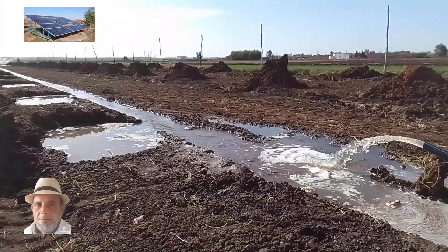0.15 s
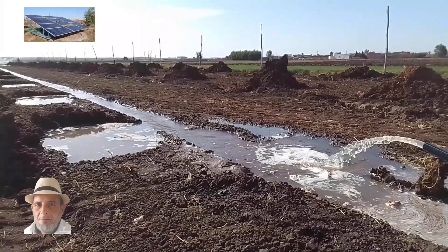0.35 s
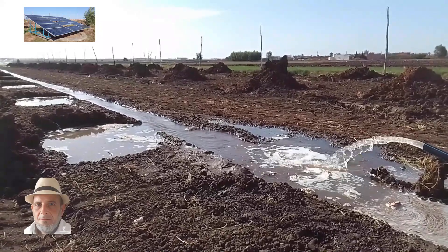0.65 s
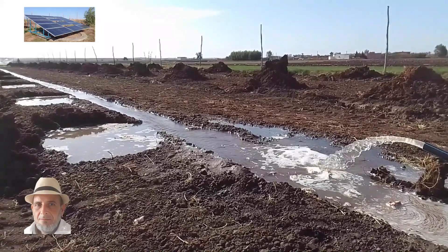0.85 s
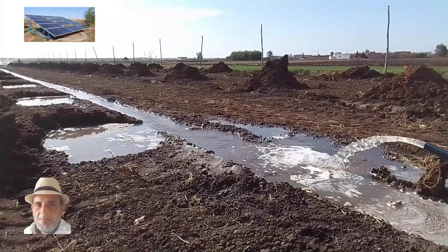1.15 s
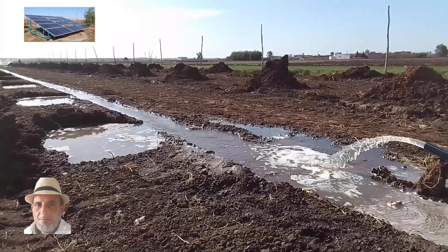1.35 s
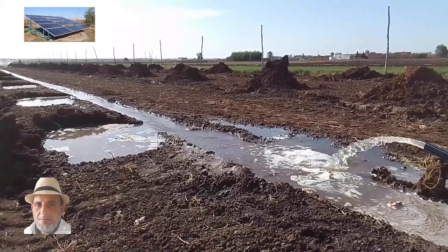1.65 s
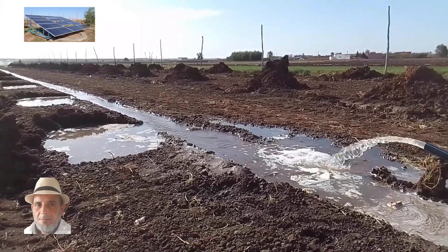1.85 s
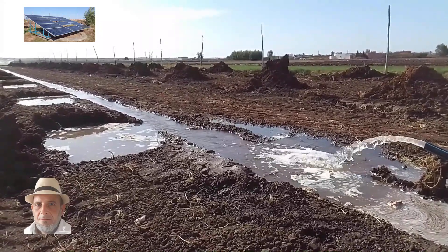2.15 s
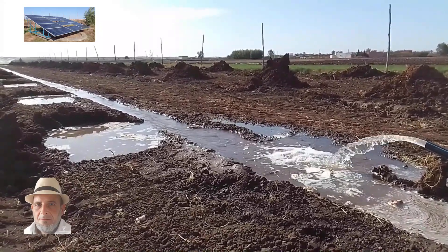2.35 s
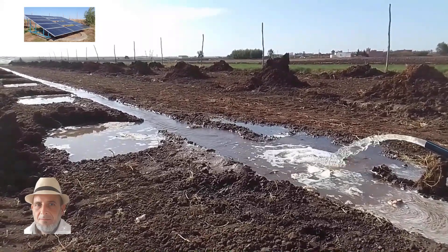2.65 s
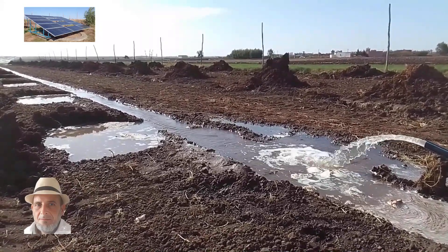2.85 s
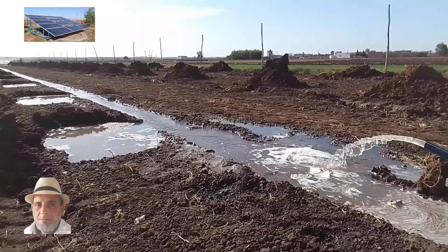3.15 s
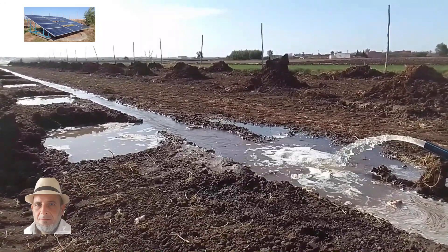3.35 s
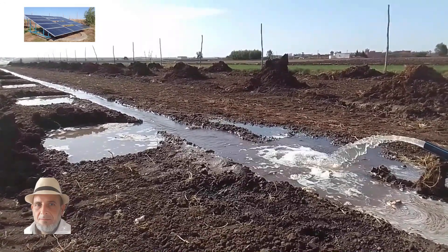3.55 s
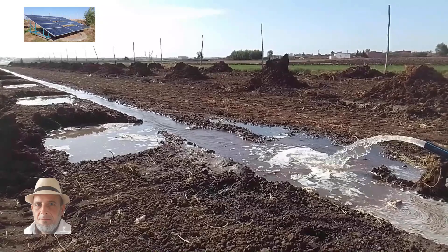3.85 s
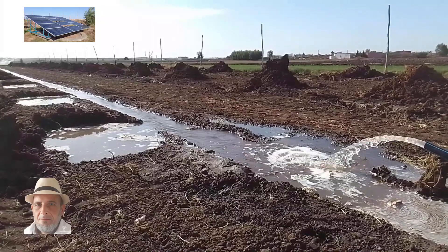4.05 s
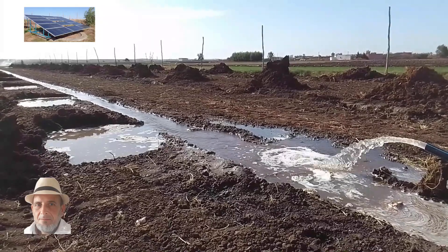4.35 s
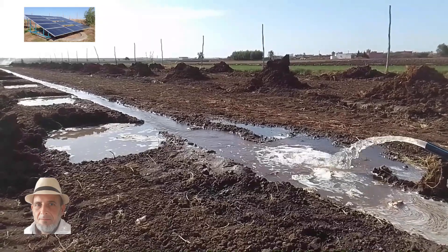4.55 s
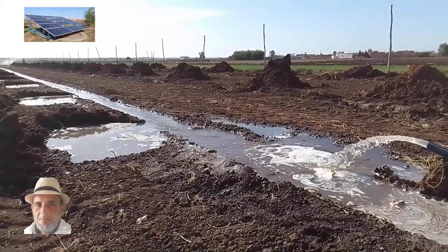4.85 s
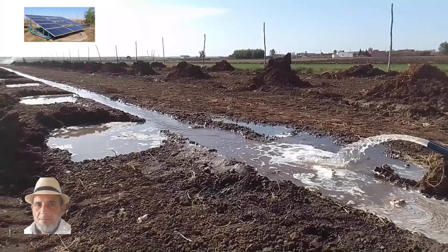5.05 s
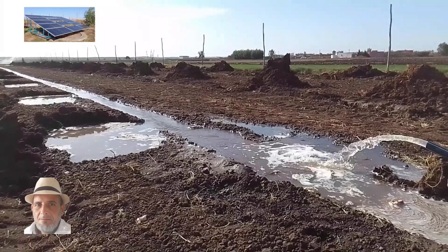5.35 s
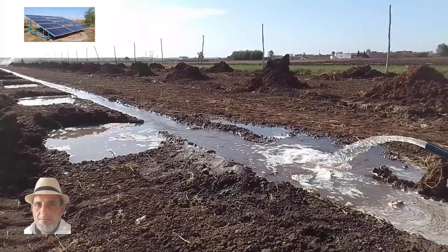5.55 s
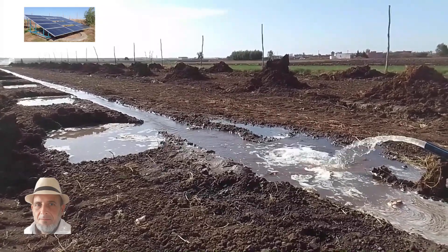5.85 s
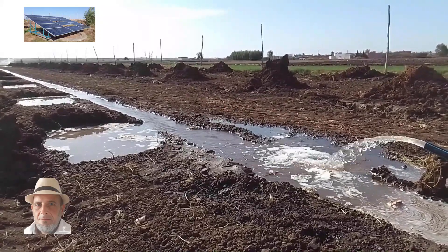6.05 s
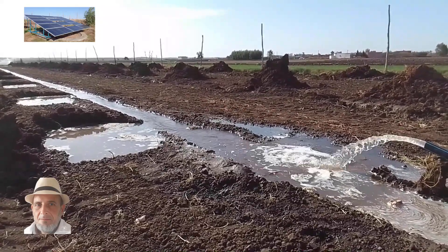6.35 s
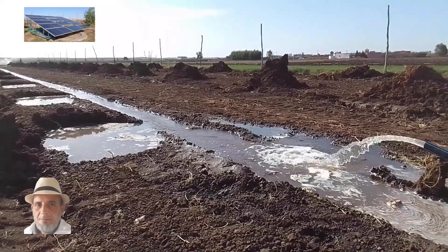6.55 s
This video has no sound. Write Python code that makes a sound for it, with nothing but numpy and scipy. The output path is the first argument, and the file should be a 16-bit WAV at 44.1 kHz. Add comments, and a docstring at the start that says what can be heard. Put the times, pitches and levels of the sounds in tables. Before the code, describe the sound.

A thick jet of water from an irrigation hose plunges into a flooded furrow in an open field. It splashes continuously in small uneven surges, churning the pool with gurgling bubbles while fine spray patters and fizzes on the surface. Brief plops, sharp drop ticks and faint smacks poke through at random. The sound is bright, with no echo, as from one small microphone.

```python
"""Hose jet in a flooded furrow

A thick irrigation jet plunges into standing water in an open field. It lands in lumps: each churns
the pool, traps air bubbles that ring, and throws spray that patters back. Large air pockets plop,
near drops tick, flat blobs smack. No echo; one small microphone with a bright port."""
import sys
import numpy as np
from scipy import signal
from scipy.fft import rfft, irfft
from scipy.io import wavfile

SR = 44100
rng = np.random.default_rng(int(sys.argv[2]) if len(sys.argv) > 2 else 0)


def waveform_to_disk(signal):
    """Save audio, clipped to [-1, 1], as 16-bit WAV at the path in sys.argv[1]."""
    frames = np.transpose(np.atleast_2d(signal))
    scaled = np.clip(frames, -1, 1) * 32767
    samples = np.round(scaled).astype(np.int16)
    wavfile.write(sys.argv[1], SR, samples)


N = 295029

# droplets falling on water: (frequency [Hz], gain [dB])
SPRAY_SPECTRUM = [(30, -40.5), (400, -8), (1800, -6), (2800, -13.5), (4200, -16.5), (5600, -11),
                  (6300, -11.5), (7900, -6.5), (8800, -2), (10300, 2), (11500, -9), (12700, -17.5),
                  (14300, -20), (16000, -32)]
# snap of an impact over a faint push of air: (frequency [Hz], gain [dB])
SNAP_SPECTRUM = [(30, -12), (150, -10), (1500, -25), (3800, -2), (5300, 7.5), (7200, 10), (11000, 2.5),
                 (16000, -25)]


def gain_of(db):
    """dB to amplitude."""
    return 10 ** (np.asarray(db) / 20)


def unit_rms(x):
    """Scale to rms 1."""
    return x / np.sqrt(np.mean(x ** 2) + 1e-20)


def curve(points):
    """Spectrum table as a function Hz -> dB, linear over log frequency."""
    knots_hz, db = np.transpose(points)
    return lambda hz: np.interp(np.log(hz + 1), np.log(knots_hz + 1), db)


def add(mix, start_s, sound):
    """Mix a sound in at start_s."""
    part = mix[max(round(start_s * SR), 0):][:len(sound)]
    part += sound[:len(part)]


def coloured(x, db_at, size=4096):
    """Minimum-phase filter of gain db_at(Hz): clicks ring only after they strike."""
    log_gain = np.log(gain_of(db_at(abs(np.fft.fftfreq(size, 1 / SR)))))
    taps = np.fft.ifft(np.exp(signal.hilbert(log_gain).conj())).real
    return signal.oaconvolve(x, taps[:size // 2])[:N]


def wander(slow_hz, fast_hz):
    """Random drift, rms 1, equal power per octave between two rates."""
    hz = np.fft.rfftfreq(N, 1 / SR) + 1e-6
    shape = 1 / np.sqrt(hz * (1 + (slow_hz / hz) ** 4) * (1 + (hz / fast_hz) ** 4))
    return unit_rms(irfft(rfft(rng.standard_normal(N)) * shape, N))


def impacts(per_s, spread_db, cap):
    """Random clicks of either sign: most near size 1, a few up to cap * spread_db away."""
    size = gain_of(spread_db * np.minimum(rng.exponential(1, N), cap))
    return size * rng.choice([-1, 1], N) * (rng.random(N) < per_s / SR)


def arch(start_s, length_s, rise_share=0.4):
    """Quick swell from 0 to 1, slower ebb."""
    knots_s = [start_s, start_s + rise_share * length_s, start_s + length_s]
    return np.sin(np.pi * np.interp(np.arange(N) / SR, knots_s, [0, 0.5, 1]))


def jet_surges(lull_db=-3.5):
    """Lift of pool and spray in dB: thick slugs of the jet mostly raise both, each by its own amount (a few
    lower the pool); thin stretches lower both."""
    # slugs, one splash each: (start [s], length [s], pool lift [dB], spray lift [dB])
    slugs = [(0.11, 0.23, 0.5, 1.5), (0.248, 0.29, 2, 1), (0.523, 0.089, 1, 5), (.92, 0.037, 0, 2.5),
             (0.99, 0.1, 3, 0.5), (1.202, 0.19, 2.5, 0), (1.513, 0.038, 2, 5.5), (1.696, 0.14, 0, 3.5),
             (2.032, 0.085, 0, 1), (2.482, 0.15, -2.5, 3.5), (2.643, 0.1, 5, 1.5), (2.896, 0.16, -0.5, 3.5),
             (3.104, 0.058, 3.5, 5.5), (3.244, 0.04, 4, 2.5), (3.363, 0.31, 1.5, 2.5),
             (3.648, 0.039, 4.5, 2), (3.795, 0.17, 3, 0.5), (4.02, 0.18, 0, 3), (4.343, .06, 2, 2.5),
             (4.44, 0.28, 2, 1.5), (4.75, 0.11, 2.5, 1), (4.917, 0.36, 0, 2.5), (5.277, 0.18, 2.5, 2.5),
             (5.541, 0.036, 3, 5), (5.937, 0.036, 4, 1), (6.064, 0.047, 3.5, 3.5), (6.142, 0.034, 3.5, 4),
             (6.298, 0.06, 3.5, 2.5), (6.507, 0.07, 4, 1)]
    # thin stretches: (start [s], length [s])
    lulls = [(0.635, 0.045), (1.14, 0.054), (1.384, 0.044), (1.975, 0.054), (2.6, 0.049), (3.013, 0.065),
             (3.309, 0.058), (3.573, 0.099), (3.72, 0.13), (5.69, 0.051), (5.852, 0.035), (6.196, 0.093)]
    thick_db = sum(np.outer(lifts_db, arch(start_s, length_s)) for start_s, length_s, *lifts_db in slugs)
    thin = sum(arch(start_s, length_s) for start_s, length_s in lulls)
    return thick_db + lull_db * thin


def churn(lumps, lump_db=1.38, flicker_db=1.75, wash_db=-5, level_db=-1.5):
    """The jet slaps the pool over a wash of foam."""
    # churning pool: (frequency [Hz], gain [dB])
    pool_spectrum = [(20, -34), (80, -38), (130, -21.5), (220, -11), (400, -17.5), (600, -6.5), (1000, -2),
                     (1250, -2), (1450, 2.5), (1780, -1.5), (2080, 2.5), (2500, -13), (3200, -19.5),
                     (6000, -49)]
    slaps = unit_rms(impacts(per_s=1500, spread_db=3.5, cap=4.9))
    wash = gain_of(wash_db) * rng.standard_normal(N)
    envelope = gain_of(lump_db * lumps + flicker_db * wander(8.2, 105))
    return gain_of(level_db) * unit_rms(coloured((slaps + wash) * envelope, curve(pool_spectrum)))


def bubble_ring(hz, swell_cycles, glide, samples=3000):
    """One air pocket swells and dies away; its pitch rises as it nears the surface."""
    cycles = hz * np.arange(samples) / SR
    age = cycles / swell_cycles
    pitch_hz = hz * (1 + glide * np.tanh(age / 4))
    return age * np.exp(1 - age) * np.sin(2 * np.pi * np.cumsum(pitch_hz) / SR)


def bubbles(band_hz, per_s, swell_cycles, glide, spread_db, tilt_db, level_db, sizes=40):
    """Trapped bubbles ring at random, the smaller the higher; tilt_db is the gain change up the band."""
    low_hz, high_hz = band_hz
    births = impacts(per_s, spread_db, cap=3)
    size_index = rng.integers(0, sizes, N)
    out = np.zeros(N)
    for k, (offset, sustain) in enumerate(rng.random((sizes, 2))):
        smallness = (k + offset) / sizes
        hz = low_hz + (high_hz - low_hz) * smallness
        ring = gain_of(tilt_db * smallness) * bubble_ring(hz, swell_cycles * (0.5 + sustain), glide)
        out += signal.oaconvolve(births * (size_index == k), ring)[:N]
    return gain_of(level_db) * unit_rms(out)


def spray(lumps, lump_db=1.63, flicker_db=2.15, mist_db=-7, level_db=-2):
    """Clumps of droplets patter on the water over a fine mist."""
    drops = unit_rms(impacts(per_s=4000, spread_db=3.5, cap=3.9))
    mist = gain_of(mist_db) * rng.standard_normal(N)
    envelope = gain_of(lump_db * lumps + flicker_db * wander(36, 170))
    return gain_of(level_db) * unit_rms(coloured((drops + mist) * envelope, curve(SPRAY_SPECTRUM)))


def plops(swell_cycles=1.35, glide=0.073, trim_db=-0.4):
    """The largest air pockets close and ring for a few strong cycles."""
    # air pockets: (time [s], level [dB], starting pitch [Hz])
    pockets = [(0.1317, -18.5, 1710), (0.303, -21.5, 2400), (0.3478, -22, 950), (0.5374, -18.5, 1520),
               (0.562, -43, 252), (0.566, -17.5, 1430), (0.939, -11, 1520), (1.0321, -17, 1760),
               (1.138, -43, 220), (1.3034, -22, 1730), (1.3354, -21, 1450), (1.4234, -21.5, 1510),
               (1.7086, -19.5, 1880), (1.8494, -25, 890), (2.167, -43, 242), (2.4209, -18.5, 1920),
               (2.4653, -25.5, 850), (2.506, -16.5, 2030), (2.5437, -19.5, 1800), (2.6882, -18, 1500),
               (2.7761, -14, 1790), (2.843, -26, 570), (2.853, -29, 1480), (2.904, -16, 1940),
               (2.947, -19, 1610), (3.1415, -18, 1690), (3.26, -39, 253), (3.298, -35, 425),
               (3.769, -21, 1430), (4.0431, -14.5, 1890), (4.3657, -19, 1760), (4.379, -20, 1970),
               (4.5927, -17.5, 1540), (4.6636, -17.5, 1480), (4.67, -15.5, 1920), (4.73, -25.5, 1020),
               (4.824, -33.5, 310), (4.9657, -24, 990), (5.2844, -29, 980), (5.3124, -20, 1340),
               (5.447, -13, 1890), (5.5415, -27, 790), (5.5508, -22, 1850), (5.612, -24, 630),
               (5.9212, -17, 2010), (6.0174, -17, 1700), (6.147, -17.5, 1900)]
    out = np.zeros(N)
    for start_s, db, hz in pockets:
        add(out, start_s, gain_of(db + trim_db) * bubble_ring(hz, swell_cycles, glide))
    return out


def ticks(ping_hz=9700, ping_db=-0.5, crack_db=-4, scatter_db=-11, scatter_rise_s=0.0018, samples=900):
    """A near drop cracks on the surface, rings a tiny bubble and scatters droplets."""
    # nearest drops: (time [s], level [dB])
    near_drops = [(0.292, -10.5), (0.392, -13.5), (0.5878, -12), (1.075, -16), (1.1042, -10.5),
                  (1.3039, -18), (1.3438, -10), (1.424, -11), (1.468, -17), (1.7598, -11.5),
                  (2.0638, -13.5), (2.1006, -12), (2.403, -8.5), (2.547, -13.5), (2.7769, -12),
                  (2.9036, -13), (3.1408, -10.5), (3.3934, -7), (3.4077, -14), (3.4949, -13),
                  (4.224, -15.5), (4.383, -8.5), (4.5094, -13), (4.6743, -13), (4.992, -11), (5.0395, -11),
                  (5.0447, -15.5), (5.363, -14), (5.417, -8), (5.5682, -15), (5.9577, -15), (6.1655, -8.5),
                  (6.381, -13), (6.6347, -16)]
    cracks, pings, scatter = np.zeros((3, N))
    age = np.arange(samples) / SR / scatter_rise_s
    for start_s, db in near_drops:
        hz = ping_hz * (1 + 0.032 * rng.standard_normal())
        droplets = age * np.exp(1 - age) * rng.standard_normal(samples)
        add(cracks, start_s, gain_of([db + crack_db]))
        add(pings, start_s, gain_of(db + ping_db) * bubble_ring(hz, swell_cycles=2.93, glide=0.03))
        add(scatter, start_s, gain_of(db + scatter_db) * droplets)
    return pings + coloured(cracks, curve(SNAP_SPECTRUM)) + coloured(scatter, curve(SPRAY_SPECTRUM))


def smacks(rise_s=0.0011, trim_db=-1, samples=1000):
    """A blob flattens on the water in a few milliseconds and shatters into noise."""
    # flat blobs of water: (time [s], level [dB])
    blobs = [(0.336, -29), (0.587, -32), (0.817, -25), (1.423, -44), (1.567, -30), (2.401, -37),
             (2.776, -27.5), (3.493, -29), (3.532, -27), (3.87, -29), (4.381, -41), (5.483, -30),
             (5.567, -20), (5.829, -29), (5.955, -27), (6.634, -25.5)]
    age = np.arange(samples) / SR / rise_s
    out = np.zeros(N)
    for start_s, db in blobs:
        snap = unit_rms(coloured(rng.standard_normal(samples), curve(SNAP_SPECTRUM))[:samples])
        add(out, start_s, gain_of(db + trim_db) * age * np.exp(1 - age) * snap)
    return out


def scene(pool_db=-35.5, splash_db=-34):
    """Surges and smaller lumps of the jet drive pool and spray together; two identical channels."""
    pool_lift_db, spray_lift_db = jet_surges()
    lumps = wander(slow_hz=11, fast_hz=57)
    gulps = bubbles(band_hz=(164.5, 305), per_s=55, swell_cycles=1, glide=0.12,
                    spread_db=4, tilt_db=4, level_db=-24)
    blips = bubbles(band_hz=(1293, 2080), per_s=22, swell_cycles=4.3, glide=0.064,
                    spread_db=-3.2, tilt_db=1.5, level_db=-11)
    gurgle = bubbles(band_hz=(526.4, 2212), per_s=380, swell_cycles=1.9, glide=0.043,
                     spread_db=2, tilt_db=9, level_db=-5)
    drips = bubbles(band_hz=(2570, 3770), per_s=96, swell_cycles=4.6, glide=0.032,
                    spread_db=1.5, tilt_db=-4.5, level_db=-20.5)
    tinkle = bubbles(band_hz=(4520, 8330), per_s=300, swell_cycles=6.2, glide=0.021,
                     spread_db=4, tilt_db=13, level_db=-14)
    fizz = bubbles(band_hz=(8700, 11000), per_s=510, swell_cycles=5.3, glide=0.014,
                   spread_db=17.5, tilt_db=2.5, level_db=-8.5)
    pool = churn(lumps) + gurgle * gain_of(1.63 * lumps) + blips + gulps
    splash = spray(lumps) + (drips + tinkle + fizz) * gain_of(1.95 * lumps)
    jet = gain_of(pool_db + pool_lift_db) * pool + gain_of(splash_db + spray_lift_db) * splash
    return np.tile(jet + plops() + ticks() + smacks(), (2, 1))


def record(dry, cutoff_hz=15850):
    """Microphone housing colour, then the band limit."""
    # bell-shaped dips and peaks of the housing: (centre [Hz], width [Hz], gain [dB])
    housing_bells = [(335, 66, -6.5), (2376, 150, -5), (3010, 344, -6.5), (3630, 180, -1),
                     (3855, 276, -11.5), (4300, 82, -23), (5220, 140, -14), (5400, 270, 3),
                     (6505, 320, -13), (8400, 150, -6), (8660, 720, 5.5), (9640, 300, 1), (12800, 350, -4),
                     (13700, 250, -7), (14700, 300, -2)]

    def housing_db(hz):
        return sum(db * np.exp(-(2 * (hz - centre_hz) / width_hz) ** 2)
                   for centre_hz, width_hz, db in housing_bells)

    heard = np.array([coloured(channel, housing_db) for channel in dry])
    low_pass = signal.firwin(511, cutoff_hz, window=("kaiser", 9), fs=SR)
    return signal.oaconvolve(heard, low_pass[None], "same", axes=1)


dry = scene()
out = record(dry)
waveform_to_disk(out)
```